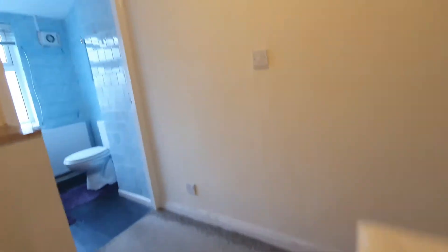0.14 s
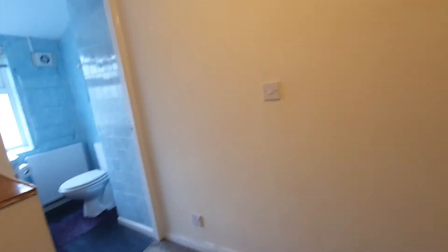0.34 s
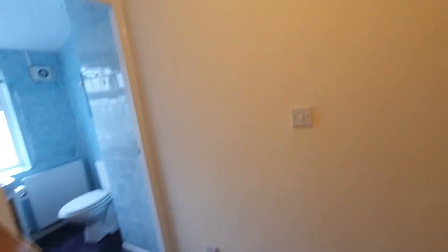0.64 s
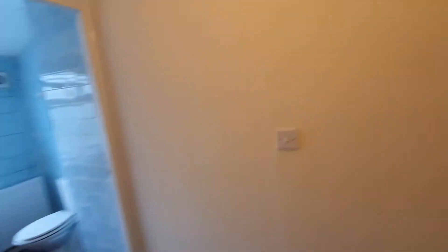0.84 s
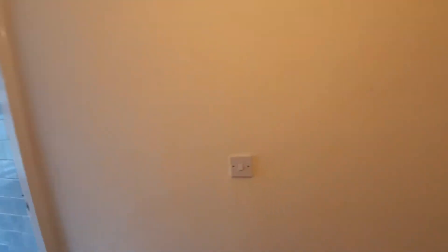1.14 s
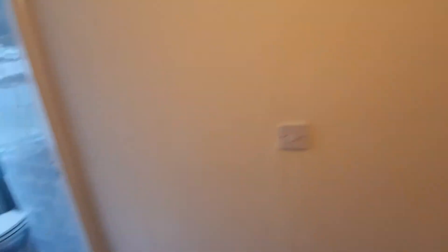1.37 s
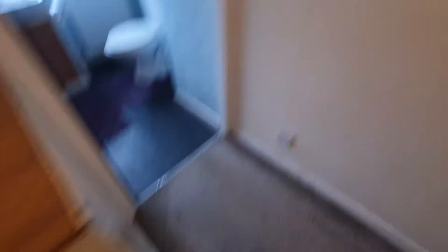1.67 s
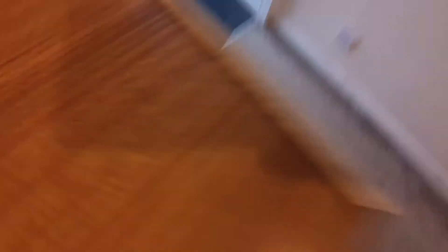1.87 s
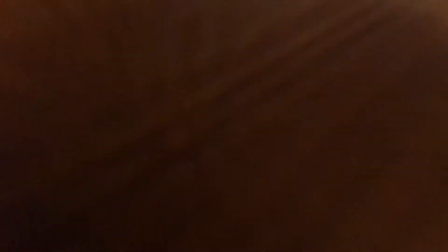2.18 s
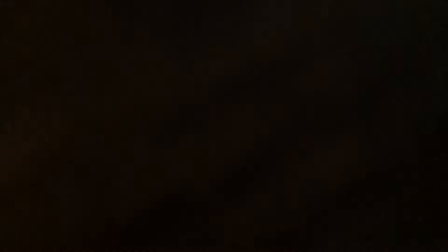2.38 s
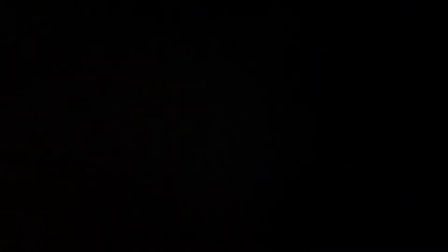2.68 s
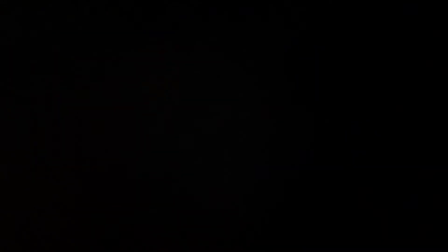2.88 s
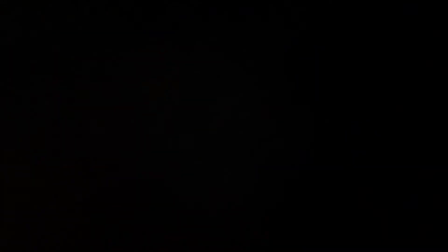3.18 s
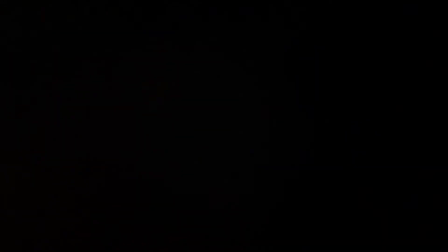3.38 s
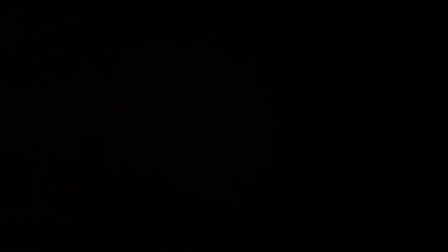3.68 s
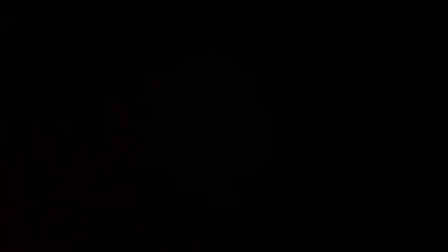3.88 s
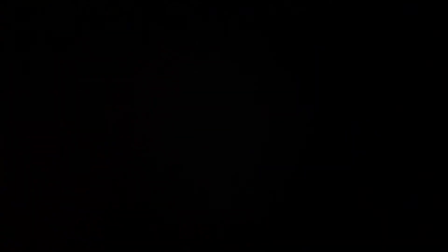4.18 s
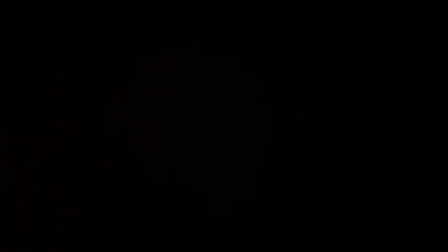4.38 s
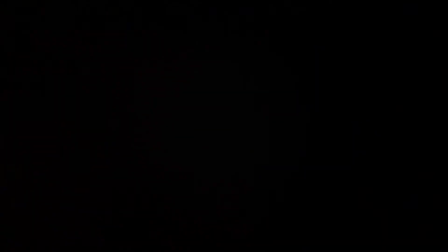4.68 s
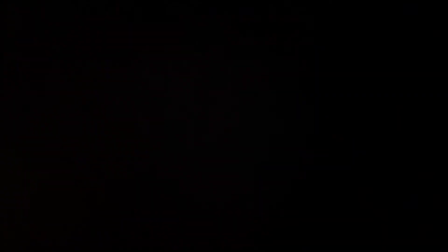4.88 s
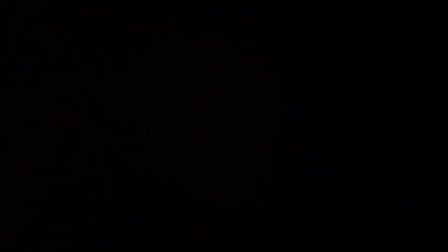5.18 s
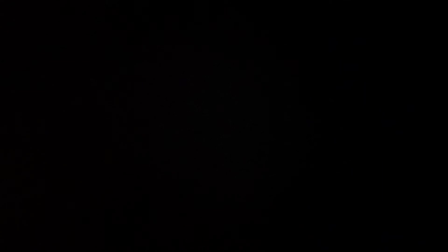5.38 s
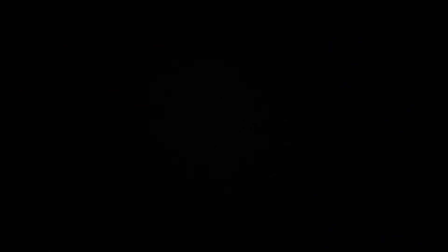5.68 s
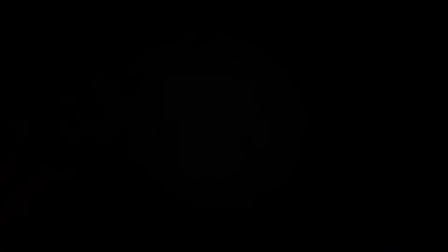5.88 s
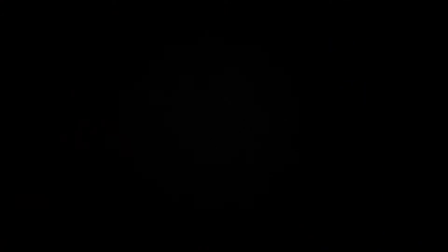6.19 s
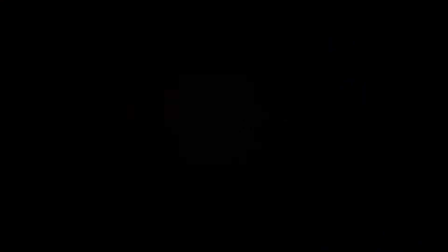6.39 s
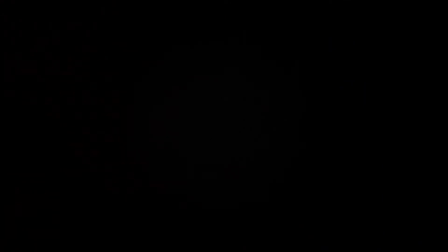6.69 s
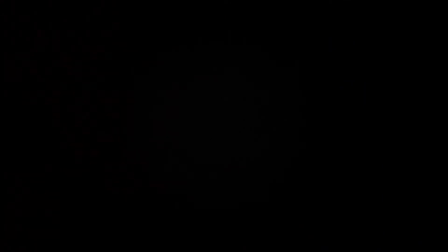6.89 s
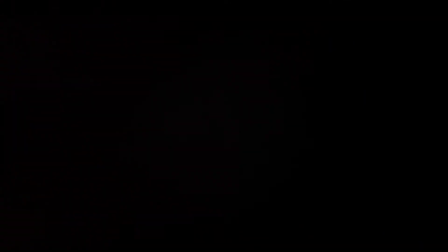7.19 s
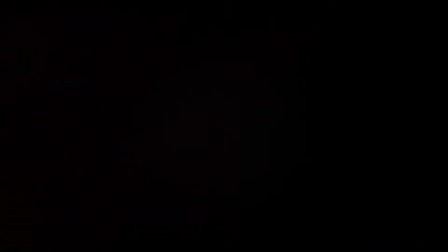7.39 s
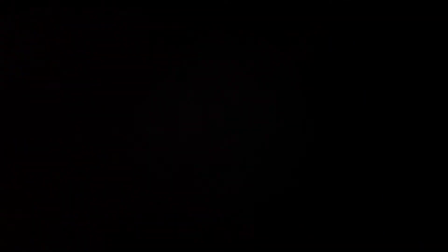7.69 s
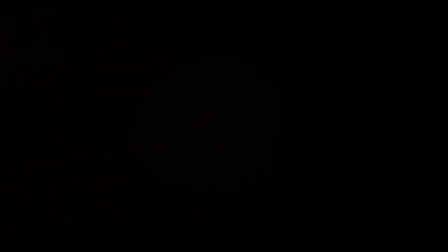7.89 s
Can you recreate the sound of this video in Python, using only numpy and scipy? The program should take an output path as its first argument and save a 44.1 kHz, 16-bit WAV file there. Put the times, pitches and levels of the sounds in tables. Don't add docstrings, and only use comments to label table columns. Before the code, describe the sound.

Soft heel thuds on carpeted boards and swishing clothes come first, with low air buffets mostly at the right. A phone in its case then lands on a wooden rail with rapid thumps and sharp snaps. Near quiet follows, with faint finger rubs and ticks, before a deep thud, scrapes and the heaviest knocks as it is shifted. It ends in small brushes and hush. Small room, microphones touching the wood.

```python
import sys
import numpy as np
from scipy import signal
from scipy.fft import rfft, irfft
from scipy.io import wavfile
from scipy.ndimage import uniform_filter1d, minimum_filter1d

SR = 44100
rng = np.random.default_rng(int(sys.argv[2]) if len(sys.argv) > 2 else 0)


def wav_out(sig):
    wavfile.write(sys.argv[1], SR, np.round(np.clip(np.atleast_2d(sig).T, -1, 1) * 32767).astype(np.int16))


def field_ratio(decibels):
    return 10 ** (np.asarray(decibels, dtype=float) / 20)


N = 354563
T = np.arange(N) / SR
STEP = T[::32]
HZ = np.arange(N // 2 + 1) * SR / N + 1


def shape(table):
    hz, db = np.transpose(table)
    return field_ratio(np.interp(np.log(HZ), np.log(hz), db))


def window(lo_hz, hi_hz):
    return 1 / np.sqrt((1 + (lo_hz / HZ) ** 8) * (1 + (HZ / hi_hz) ** 8))


def noise(gain, alike, grain_db=0.):
    grains = field_ratio(grain_db * np.minimum(rng.exponential(size=N), 6.5))
    mid, side = rng.standard_normal((2, N)) * grains
    alike = np.clip(alike, 0, 1)
    pair = np.sqrt(1 + alike) * mid + np.sqrt(1 - alike) * side * np.array([[1], [-1]])
    out = irfft(rfft(pair) * gain, N)
    return out / np.sqrt(np.mean(out ** 2) * (1 + alike) / 2)


def walk(rate):
    hold = int(SR / rate)
    held = np.repeat(rng.standard_normal(N // hold + 1), hold)
    return 1.3 * uniform_filter1d(uniform_filter1d(held, hold), hold)[:N]


def ports(pan_db):
    ratio = field_ratio(pan_db)
    return np.array([2 * ratio / (1 + ratio), 2 / (1 + ratio)]).reshape(2, -1)


def fade(t, t60):
    return np.exp(-np.log(1000) * t / t60)


def add(out, s, sound):
    i = int(s * SR)
    out[:, i:i + sound.shape[1]] += sound[:, :N - i]


def swell(s, rise, fall, db, rounded):
    return field_ratio(db - 20 * (np.abs(STEP - s) / np.where(STEP < s, rise, fall)) ** rounded)


def fine(gains):
    return np.array([np.interp(T, STEP, g) for g in gains])


# t/s, peak level/dB, bounce f/Hz, left minus right/dB, rail and room level/dB
THUMPS = [(2.1314, -15.5, 153, -62, -18), (2.204, -16.5, 150, 29, 3.5), (2.29, -13, 200, 32, -10),
          (2.303, -15.5, 136, 23, -23.5), (2.3921, -23.5, 237, -10, -2), (2.403, -15.5, 150.1, 16, -13),
          (2.518, -24.5, 250, 14.5, 0.5), (2.5285, -3.5, 144, -30, -25), (2.539, -11, 93, 1.5, -10.5),
          (3.688, -46.5, 117, 3, -15.5), (5.424, -31, 90, -7, -4), (5.6824, 3.5, 108.7, 6.5, -18.5),
          (6.218, -30, 136, 22, -13), (6.366, -24, 121, 9.5, -11), (6.581, -12.5, 143, 11.5, -13),
          (6.7748, -5.5, 91, 10, -16), (6.8801, -5.5, 200, 35.5, -14.5), (6.8859, 1.5, 147, 6, -19.5),
          (6.903, -9, 55.6, 10, -38)]
BOOMS = [
    (0.604, -27.5, 115, 35, -1.5),
    (.8, -32, 126.5, 9, -2),
    (1.215, -45.5, 237, 3, 1.5),
    (1.788, -35, 271.3, 7.5, -6.5),
    (3.1933, -42.5, 502, 0.5, -1),
    (5.701, -32, 54, 4, -25),
    (5.89, -22.5, 507, 6, -4.5),
    (6.797, -14, 53.76, 1.5, -14),
    (6.892, -26, 180, 6, -20),
    (5.73, -26, 100, 5, -20),
]
RECOILS = [
    (6.8905, -8, 110, 6, -20),
    (5.712, -14, 80, 6, -20),
    (6.802, -17, 130, 8, -20),
    (2.564, -20, 100, 0, -15),
]
# f/Hz, level/dB, t60/s
RAIL = [(54, -5.5, 0.53), (92, -5, 0.16), (115, -7.5, 0.16), (144, -15, 0.062), (185.7, -17.5, 0.19),
        (250, -20, 0.2), (298, -18, 0.11), (402, -18, 0.26), (496, -19.5, 0.35), (614, -33.5, 0.49),
        (700, -40.5, 0.16), (804, -44, .4)]
# f/Hz, level/dB per Hz
ROOM = [(18, -35.5), (30, 1), (60, 2.5), (244, -5), (272, -19), (309, -4), (367, -19.5), (475, -16.5),
        (864, -27.5), (5000, -54), (6500, -87.5), (11000, -120)]
THUMP_CYCLES, BOOM_CYCLES = 5.54, 34.3
ROOM_T60_S, CLATTER_T60_S = 0.45, 0.18


def thumps():
    out, t = np.zeros((2, N)), T[:SR - SR // 4]
    room = noise(shape(ROOM), alike=0.35)
    clatter = irfft(rfft(room) * window(300, 950), N)
    palm = signal.butter(3, 1500, fs=SR, output="sos")
    blows = [(*row, THUMP_CYCLES) for row in THUMPS]
    blows += [(*row, BOOM_CYCLES) for row in BOOMS]
    blows += [(*row, THUMP_CYCLES) for row in RECOILS]
    chance = rng.standard_normal((len(blows), 2, 2, len(RAIL), 1))
    mode_hz, mode_db, mode_t60 = np.transpose(RAIL)[:, :, None]
    for (s, db, hz, pan_db, ring_db, cycles), (detune, spread) in zip(blows, chance):
        phase = 2 * np.pi * hz * t + 2.0 * (1 - np.exp(-t * hz / 0.052))
        bounce = -np.sin(phase) * fade(t, cycles / hz)
        bounce = bounce * (1 - 0.54 * np.exp(-t * hz / 0.24)) * (1 - np.exp(-t / 0.0001))
        bounce = signal.sosfilt(palm, bounce)
        gain = field_ratio(mode_db + 6.2 * spread[:1] + 1.2 * spread) / (1 + (mode_hz / (7.5 * hz)) ** 2)
        gain = gain / (1 + (hz / (2.3 * mode_hz)) ** 2)
        swing = np.sin(2 * np.pi * mode_hz * (1 + 0.0081 * detune[:1] + 0.015 * detune) * t)
        rail = np.sum(gain * swing * fade(t, mode_t60), axis=1) * (1 - np.exp(-t / 0.0079))
        i = int(s * SR)
        tail = room[:, i:][:, :len(t)] * (1 - np.exp(-t / 0.0025)) * fade(t, ROOM_T60_S)
        tail = tail / (1 + (hz / 230) ** 2)
        tail = tail + 2.0 * clatter[:, i:][:, :len(t)] * fade(t, CLATTER_T60_S)
        far = field_ratio(ring_db) * ports(0.088 * pan_db) * (1.2 * rail + 0.42 * tail)
        add(out, s, field_ratio(db) * (0.94 * ports(pan_db) * bounce + far))
    return out


# t/s, peak level/dB, sharpness f/Hz, left minus right/dB, share of leading spike
SNAPS = [(2.2056, 1, 3500, 26, 0.75), (2.29, -9.5, 3020, 31, 1.7), (2.3916, -14, 3700, 17, 0.37),
         (2.3911, -6, 3130, 25.5, 1.2), (2.5164, -29, 2970, 13, 0.83), (2.5195, -13, 2470, 14.5, .9),
         (2.5309, -5.5, 3820, 24, 0.033), (6.7742, -7, 2780, 14, 0.11), (6.7763, -5.5, 3600, 1, 0.36),
         (6.7772, -17, 3430, 0, 0.51), (6.8859, -24, 1700, 5.5, 0.12)]
# f/Hz, level/dB, t60/s
SHELL = [(2600, -8, .005), (3400, -12.5, .004), (7000, -16.5, 0.0022)]


def snaps():
    out, t = np.zeros((2, N)), T[:SR // 50]
    ring = sum(field_ratio(db) * np.sin(2 * np.pi * hz * t) * fade(t, t60) for hz, db, t60 in SHELL)
    spray = rng.standard_normal((len(SNAPS), 2, len(t)))
    for (s, db, hz, pan_db, lead), hiss in zip(SNAPS, spray):
        turn = t * hz
        spike = lead * np.exp(-((turn - .5) / 0.19) ** 2)
        drop = np.exp(-((turn - 1.15) / np.where(turn < 1.15, .22, .7)) ** 2)
        snap = spike - drop + min(lead, 1) * ring + 0.027 * hiss * fade(t, 0.02)
        add(out, s - .5 / hz, field_ratio(db) * ports(pan_db) * snap)
    return out


# t/s, peak level/dB, ring f/Hz, left minus right/dB
NAILS = [(1.7782, -28, 2600, -33), (2.2546, -33, 1750, -18), (1.7889, -34, 1500, -6),
         (4.521, -33, 5300, -18), (4.5852, -39, 2500, -3), (4.6145, -35, 5200, 3), (5.8885, -13, 1800, 4.5),
         (5.9665, -27.5, 5500, -10), (5.8895, -12, 6000, 5), (5.8908, -18, 6200, 5.5),
         (5.9545, -27.5, 6000, 1), (6.0262, -29, 2400, -1), (6.03, -26.5, 5500, -1),
         (6.4212, -33.5, 7500, -10), (6.602, -37.5, 8000, -2), (4.4273, -52, 5000, -1),
         (4.4507, -49, 5000, -1), (2.3028, -30, 3600, 1), (2.553, -44, 6000, 0.5), (2.519, -30, 6000, 10),
         (2.4185, -38, 2500, 0), (5.9868, -24, 1900, -6), (6.0143, -20.5, 7000, -7),
         (6.1475, -40.5, 4800, -12), (6.1949, -36, 1300, -1), (6.3944, -34, 4360, -16),
         (6.4153, -31, 1600, -10.5), (6.4368, -17, 1770, -4), (6.435, -24, 2000, -6)]
CREAKS = [(2.103, -33.5, 4760, -17), (2.3024, -25, 1497, 1), (2.4044, -33, 3180, -11),
          (2.4121, -27.5, 2400, 16), (2.4889, -33, 1580, -33), (5.898, -27, 2500, 3),
          (6.008, -32, 2200, -6), (5.979, -34, 3000, 0), (4.7855, -44, 2600, 0), (5.021, -48, 2680, -1),
          (2.1025, -42, 1300, -15), (6.048, -38, 1500, 0), (2.828, -44, 2520, -12.5),
          (3.1925, -34.5, 6160, -11), (5.882, -24.5, 1620, 22.5), (5.9362, -24, 1570, -2),
          (5.9534, -22.5, 1900, 4), (6.0305, -29, 2140, 0), (6.2203, -34, 1460, 7), (6.3377, -23, 2250, 2),
          (6.5819, -27.5, 1770, 1)]
NAIL_TOP_DB, CREAK_TOP_DB = -4, -18
TICK_T60_S, TICK_STRETCH = .008, 0.3


def ticks():
    out, t = np.zeros((2, N)), T[:SR // 10]
    taps = [(*row, NAIL_TOP_DB) for row in NAILS] + [(*row, CREAK_TOP_DB) for row in CREAKS]
    bursts = rng.standard_normal((len(taps), 2, 2, len(t)))
    bursts[..., 0] = 4.5
    edge = signal.butter(2, [4800, 13500], "band", fs=SR, output="sos")
    for (s, db, hz, pan_db, top_db), (body, top) in zip(taps, bursts):
        t60 = TICK_T60_S * field_ratio(TICK_STRETCH * (db + 33))
        shell = signal.butter(1, [hz / 1.35, min(hz * 1.35, SR / 2.5)], "band", fs=SR, output="sos")
        body = signal.sosfilt(shell, body * fade(t, t60))
        top = signal.sosfilt(edge, top * fade(t, 1.4 * t60) * fade(t, t60))
        tick = body / np.abs(body).max() + field_ratio(top_db) * top / np.abs(top).max()
        add(out, s, field_ratio(db) * ports(pan_db) * tick)
    return out


# t/s, width/s, rub level/dB, sizzle above rub/dB, body above rub/dB
FINGERS = [(2.26, 0.22, -56.5, -6, 1), (2.362, 0.048, -48, 0.5, -13), (2.46, 0.12, -60.5, -2.5, 7),
           (3.2, 0.29, -72.5, -5, 0), (3.52, 0.19, -77.5, -3.5, -2), (3.96, 0.26, -67.5, -11, 3.5),
           (4.523, 0.12, -62.5, 0.5, 6), (4.9, 0.24, -60.5, -1.5, -1.5), (4.815, .08, -55, -20, -3),
           (5.04, .09, -68.5, -15, 2.5), (5.57, 0.16, -55.5, -1, -28), (5.67, 0.15, -48.5, -10, -3),
           (5.79, 0.36, -53.5, -10, 1), (6.362, 0.032, -55, -3, 1.5), (6.437, 0.063, -48, -13, 0.2),
           (6.66, 0.28, -55, -5.5, 0), (6.801, 0.081, -45.5, -10.5, 3), (7.793, 0.092, -64, 0, -11),
           (8.04, 0.16, -71, 5, 3)]
CLOTH = [
    (0.2, 0.11, -50, -47, 8.5),
    (.3, 0.4, -57.5, -4, -4.5),
    (1.239, 0.046, -52, -17, -16),
    (1.5, 0.52, -66, -5, -0.5),
    (0.81, 0.08, -53, -15.5, 8.5),
    (1.021, 0.44, -75.5, -1, -12.5),
    (2.0, 0.4, -76, -10.5, 13),
]
# t/s, fall/s, then levels as above
DRAGS = [
    (0.0, 0.12, -48, -6, 6),
    (0.607, 0.26, -50, -18, 6.5),
    (1.791, 0.091, -48, -18, 7),
    (2.73, 0.27, -67.5, -0.7, 1),
    (6.228, 0.12, -54.5, -11, 0.5),
    (6.9, 0.61, -62, -10.5, 0),
]
# t/s, length/s, then levels as above
SCUFFS = [
    (1.23, 0.14, -64, -21, -2.5),
    (1.458, 0.1, -63.5, -15, -3),
    (1.685, 0.099, -51.5, -13, -6),
    (2.124, 0.076, -49.5, 1.7, -6),
    (3.677, 0.12, -66.5, 8, -3.5),
    (4.591, 0.089, -58.5, 7, 6),
    (5.62, 0.1, -54.5, 4.5, -5),
    (5.878, 0.19, -50, -1.5, -3),
    (7.42, 0.12, -63.5, -12, -14),
]
# t/s, width/s, level/dB
SLEEVE = (1.5, 0.45, -66)
# t/s, left minus right/dB
GRIP = [(0.0, -4), (1.2, -4.5), (2.11, -9), (2.13, -50), (2.19, -60), (2.21, -3.5), (4.6, 1.5), (5.6, -1.5),
        (5.89, -1), (6.04, -3.5), (6.2, 1), (7.5, 2), (7.78, -12.5), (8.04, -8)]
# f/Hz, level/dB per Hz
SKIN = [(240, -29.5), (400, 1.5), (600, 0.5), (1120, -5.5), (1960, -2), (2710, -2), (3700, -2.5),
        (5300, -4.5), (6490, -8.5), (7820, -17.5), (13500, -23), (15700, -28), (16500, -41.5)]
TOUCHDOWN_S, CATCH_S, SWELL_ROUND = 2.09, 0.013, 1.18


def rub():
    skin, slip_db = shape(SKIN), 0.4 * walk(35)
    mid = noise(skin * window(1100, 7800), alike=0.12, grain_db=2.5) * field_ratio(1.3 * walk(25))
    top = noise(skin * window(12000, 11000), alike=.05, grain_db=3.5) * field_ratio(0.37 * walk(25))
    body = noise(skin * window(290, 1400), alike=0.54, grain_db=2.0) * field_ratio(0.29 * walk(23))
    dull = noise(skin * window(1400, 3200), alike=0.12, grain_db=1.2) * field_ratio(0.69 * walk(23))
    far_top = noise(skin * window(11400, 9400), alike=0.068)
    top = np.where(T < TOUCHDOWN_S, far_top + 0.11 * top, top)

    def stroke(contact, sizzle_db, body_db):
        soft = np.clip(-(sizzle_db + 6.5) / 18, 0, .9)
        return np.outer([np.sqrt(1 - soft), np.sqrt(soft), field_ratio(sizzle_db), field_ratio(body_db)], contact)

    gains = 0
    for s, width, db, *colour in CLOTH + FINGERS:
        gains = gains + stroke(swell(s, width, width, db, SWELL_ROUND), *colour)
    for s, fall, db, *colour in DRAGS:
        gains = gains + stroke(swell(s, CATCH_S, fall, db, 1), *colour)
    for s, length, db, *colour in SCUFFS:
        contact = np.clip(np.minimum((STEP - s) / 0.019, (s + length - STEP) / 0.045), 0, 1)
        contact = contact * field_ratio(db - 2.4 * np.clip((STEP - s) / length, 0, 1))
        gains = gains + stroke(contact, *colour)
    out = sum(g * layer for g, layer in zip(fine(gains), (mid, dull, top, body)))
    s, width, db = SLEEVE
    fold = noise(1 / np.sqrt(1 + ((HZ - 1480) / 150) ** 4), alike=0.44)
    fold = fold * fine([swell(s, width, width, db, 3)]) * field_ratio(2.2 * walk(14))
    return field_ratio(slip_db) * (out * ports(np.interp(T, *np.transpose(GRIP))) + fold)


# t/s, rise/s, fall/s, f/Hz, level/dB
HOLLOWS = [(0.63, .03, .08, 2500, -54), (0.82, .05, .05, 2500, -60), (0.87, .06, .12, 900, -56.5),
           (1.22, .04, .1, 1350, -60), (1.33, 0.071, .08, 550, -61), (1.5, 0.047, .06, 1600, -58),
           (1.5, .08, .08, 550, -57), (1.68, .1, .04, 1500, -61.5), (1.795, .01, .1, 1000, -47),
           (1.795, .01, .07, 2000, -51), (2.56, .02, .15, 600, -51), (4.53, .1, .15, 750, -58),
           (4.81, .04, .08, 2000, -55), (4.85, 0.065, .12, 6500, -65), (5.03, .02, .06, 2600, -62),
           (5.03, .1, .15, 700, -64), (5.16, .1, .14, 560, -63), (5.24, .18, .15, 4000, -71),
           (5.33, .1, .08, 550, -62), (5.37, 0.051, .1, 5200, -65), (5.44, 0.084, .12, 3300, -55.5),
           (5.66, .05, .04, 6200, -56), (5.895, 0.011, .05, 750, -36.5), (5.9, .01, .05, 5500, -54),
           (6.27, 0.065, .04, 2500, -59), (6.59, 0.011, .06, 1300, -46), (6.79, .02, .08, 700, -40),
           (6.845, .02, .02, 4000, -51), (6.889, .01, .02, 1300, -32), (6.96, 0.08, .2, 450, -44),
           (2.95, .08, .08, 4000, -76), (7.8, .06, .08, 2000, -70), (3.21, .02, .15, 500, -62),
           (4.72, .06, .06, 900, -68), (1.86, .05, .1, 1600, -60), (2.485, .02, .02, 1900, -50),
           (2.36, .04, .03, 6500, -54), (2.6, .07, .15, 1500, -57), (6.98, .07, .15, 800, -54),
           (6.785, .012, .07, 1600, -44)]
HOLLOW_SPREAD, HOLLOW_ALIKE = 1.25, 0.42


def hollows():
    out, t = np.zeros((2, N)), T[:SR // 2] - .2
    hiss = rng.standard_normal((len(HOLLOWS), 3, len(t)))
    grit = rng.exponential(size=(len(HOLLOWS), len(t)))
    for (s, rise, fall, hz, db), (mid, *own), grain in zip(HOLLOWS, hiss, grit):
        band = signal.butter(2, [hz / HOLLOW_SPREAD, hz * HOLLOW_SPREAD], "band", fs=SR, output="sos")
        gritty = (HOLLOW_ALIKE * mid + np.array(own)) * field_ratio(3.5 * np.minimum(grain, 6.5))
        sound = signal.sosfilt(band, gritty)
        gain = field_ratio(db - 20 * (np.abs(t) / np.where(t < 0, rise, fall)) ** 1.2)
        add(out, s + t[0], ports(np.interp(s, *np.transpose(GRIP))) * gain * sound / sound.std())
    return out


# t/s, rise/s, fall/s, bass level/dB; rise and fall are times to 20 dB down
TREADS = [
    (0.202, 1.5, 0.2, -36.5),
    (0.632, 0.036, 0.27, -36),
    (2.03, 0.51, .06, -59.5),
]
LEANS = [(2.851, 0.13, .25, -64.5), (3.7, 0.044, 0.14, -66.5), (4.02, 0.4, 0.17, -54),
         (4.468, 0.071, 0.48, -50), (4.95, 0.64, 0.35, -59.5), (5.37, 0.061, 0.24, -58.5),
         (5.431, 0.065, 0.3, -47), (5.95, 0.096, 0.14, -43), (6.445, 0.41, 0.23, -46.5),
         (7.2, 0.086, 0.26, -68), (7.46, 0.05, .15, -65)]
# same columns, then left minus right/dB
GUSTS = [
    (1.44, 0.026, 0.59, -41.5, -27.5),
    (1.66, 0.16, .1, -31, -49),
    (1.781, 0.2, .11, -35.5, -21),
    (3.52, 0.091, 0.35, -61.5, 1),
    (4.38, 0.019, 0.24, -63, 4.5),
    (7.715, 0.014, 0.12, -56.5, 3.5),
    (7.93, .1, 0.32, -64.5, -0.5),
]
# f/Hz, level/dB per Hz
BASS = [(20, -27.5), (35, -6), (50, 8.5), (80, 4), (125, -4), (200, -7), (400, -59)]
# f/Hz, width/Hz, level/dB
BOARDS = [(153, 65, -7.5), (200, 30, 1.5), (273, 72, 13), (447, 70, -16), (574, 39, -21.5)]
TREAD_RING_DB, LEAN_RING_DB, GUST_RING_DB = -0.5, -10, -28.5
LEAN_PAN_DB, LAST_STEP_S = 3, 1.2


def rumble():
    bass = noise(shape(BASS), alike=0.97) * field_ratio(0.87 * walk(22))
    ring = sum(field_ratio(db) / np.sqrt(1 + (2 * (HZ - hz) / width) ** 2) for hz, width, db in BOARDS)
    boards = noise(ring * window(190, 645), alike=0.89) * field_ratio(2.5 * walk(30))
    loads = [(*row, 0, TREAD_RING_DB) for row in TREADS]
    loads += [(*row, LEAN_PAN_DB, LEAN_RING_DB) for row in LEANS]
    loads += [(*row, GUST_RING_DB) for row in GUSTS]
    bass_gain, board_gain = 0, 0
    for s, rise, fall, db, pan_db, ring_db in loads:
        load = ports(pan_db) * swell(s, rise, fall, db, rounded=0.95)
        bass_gain = bass_gain + load
        board_gain = board_gain + field_ratio(ring_db) * load
    heel = irfft(rfft(bass) * window(89.6, 700), N) * 2.33
    return fine(bass_gain) * np.where(T < LAST_STEP_S, heel, bass) + fine(board_gain) * boards


# t/s, peak level/dB, f/Hz, left minus right/dB
PUFFS = [
    (1.283, -44, 63, -2),
    (1.32, -40.5, 59.4, 2),
    (1.429, -38, 74.5, -18),
    (1.54, -31, 80.6, -41),
    (1.593, -20.5, 68, -55),
    (1.682, -22, 64.6, -41),
    (1.75, -23, 80, -23),
    (1.848, -30, 63.4, -26),
    (7.362, -44.5, 60.5, -26),
    (8.038, -37, 65.5, -14),
]


def puffs():
    out, t = np.zeros((2, N)), T[:SR // 10] - .05
    for s, db, hz, pan_db in PUFFS:
        eddy = np.cos(2 * np.pi * hz * t) * np.exp(-(t * hz / 0.94) ** 2)
        crest = np.cos(2 * np.pi * 3.05 * hz * t) * np.exp(-(t * hz / 0.34) ** 2)
        add(out, s + t[0], field_ratio(db) * ports(pan_db) * (eddy + 0.18 * crest))
    return out


# f/Hz, level/dB per Hz
QUIET = [(15, -35.5), (25, 0.5), (65, -3), (296, -18.5), (600, -14.5), (1030, -28.5), (6550, -22.5),
         (12600, -36.5), (15200, -47.5), (16500, -55)]
QUIET_DB = -75.5


def hush():
    return field_ratio(QUIET_DB + 0.5 * walk(6)) * noise(shape(QUIET), alike=.2)


PORT_LAG_S = .00045


def scene():
    left, right = thumps() + snaps()
    blows = np.array([left, np.interp(T - PORT_LAG_S, T, right)])
    return blows + ticks() + rub() + hollows() + rumble() + puffs() + hush()


GATE_DB, GATE_S, GATE_SLOPE = -71, 0.051, 1


def gate(x):
    treble = irfft(rfft(x) * window(780, 20000), N)
    power = uniform_filter1d(np.mean(treble ** 2, axis=0), int(GATE_S * SR)) + 1e-14
    return x - treble * (1 - field_ratio(GATE_SLOPE * np.minimum(10 * np.log10(power) - GATE_DB, 0)))


def band_limit(x):
    return signal.sosfilt(signal.butter(12, 16810, fs=SR, output="sos"), x)


def record(dry):
    x = signal.sosfilt(signal.butter(4, 38, "high", fs=SR, output="sos"), gate(dry))
    x = signal.sosfilt(signal.ellip(8, .2, 70, 16200, fs=SR, output="sos"), x)
    need = np.minimum(1, 1.1 / (np.abs(x).max(axis=0) + 1e-9))
    gain = uniform_filter1d(minimum_filter1d(need, size=400), size=200)
    return band_limit(np.clip(x * gain, -1, 1))


dry = scene()
out = record(dry)
wav_out(out)
```